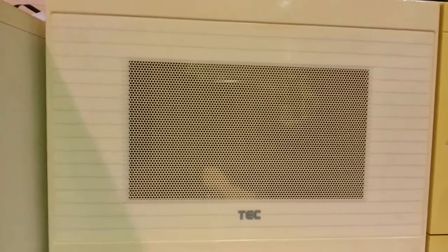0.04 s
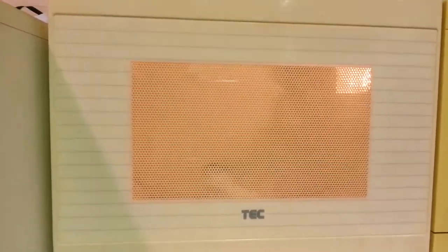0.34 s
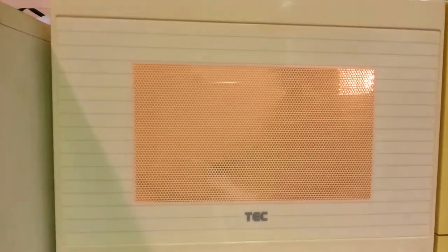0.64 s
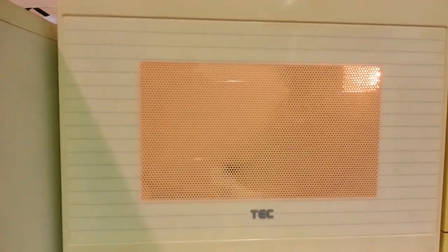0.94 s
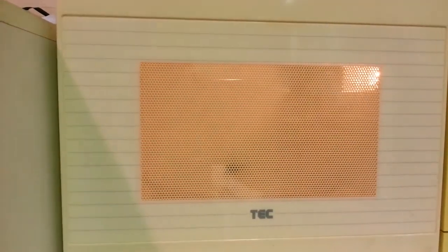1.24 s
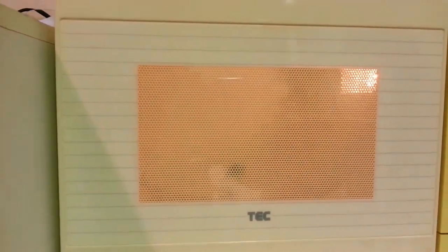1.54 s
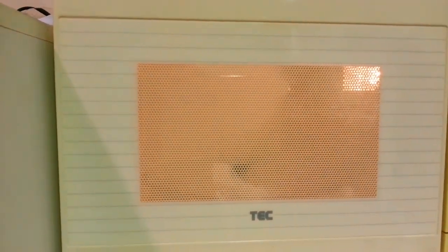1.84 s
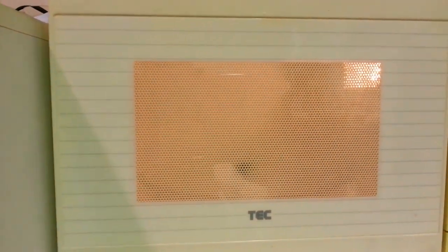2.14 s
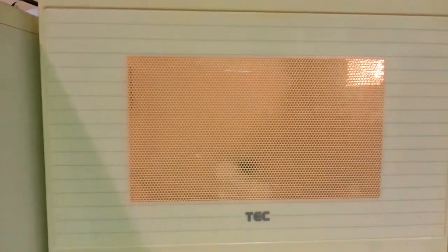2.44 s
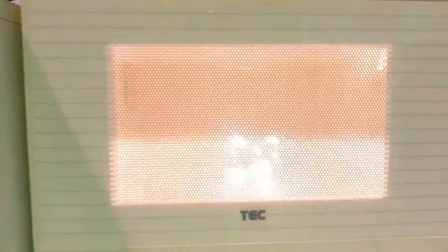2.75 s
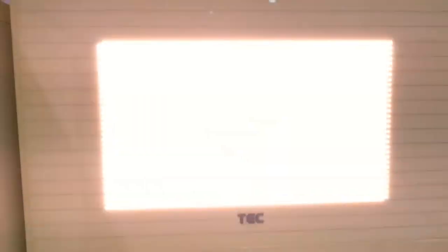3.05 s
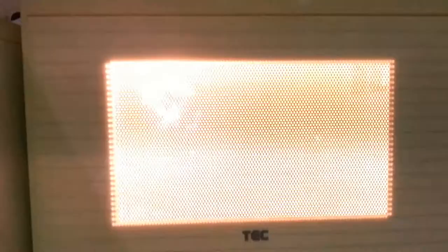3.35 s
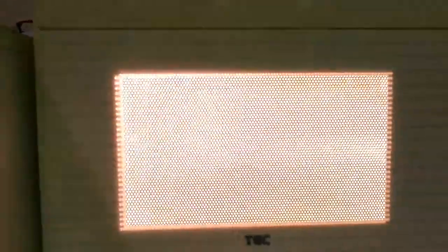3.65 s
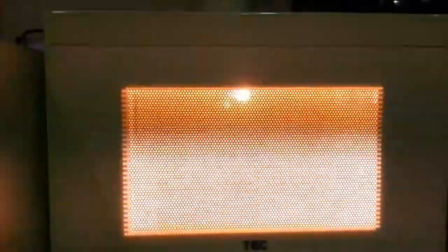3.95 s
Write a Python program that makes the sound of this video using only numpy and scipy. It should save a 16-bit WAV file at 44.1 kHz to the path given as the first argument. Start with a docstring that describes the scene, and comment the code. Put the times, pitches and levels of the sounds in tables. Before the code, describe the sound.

A microwave oven starts up close by, its metal cabinet shuddering and rattling as the fan spins up. The rattle settles and a deep electrical hum comes in, with faint ticks inside. Indoors, louder on the left.

```python
"""Beside a microwave oven, left microphone close to it, right one shaded. The motor starts, shudders
and rattles the steel cabinet while the fan runs up. The rattle settles, the transformer swells, then
the magnetron takes load with a deep mains hum. Faint ticks come from the cavity and an arc strikes
at the very end. Handling bumps the right microphone; room noise and fine hiss lie underneath."""
import sys
import numpy as np
from scipy import signal
from scipy.fft import rfft, irfft, next_fast_len
from scipy.io import wavfile
from scipy.ndimage import map_coordinates

SR = 44100
rng = np.random.default_rng(int(sys.argv[2]) if len(sys.argv) > 2 else 0)


def store_wav(level_fs):
    """Save 16-bit WAV to argv[1]."""
    pcm = np.round(np.clip(np.atleast_2d(level_fs), -1, 1) * 32767)
    wavfile.write(sys.argv[1], SR, pcm.T.astype(np.int16))


N = 176400

RUMBLE_SPECTRUM = [(30, -16), (70, 2), (130, 1), (225, -2.5), (330, 6.5), (390, 4), (540, -6), (800, -12),
                   (1300, -22.5), (3000, -62)]  # f/Hz, density/dB
RUMBLE_LEVEL = [(.25, -41), (.5, -35.5), (.85, -39.5), (1.2, -33), (1.55, -40.5), (1.75, -40.5),
                (2.15, -38), (2.6, -37), (4, -37.5)]  # t/s, level/dB
RATTLE_SPECTRUM = [(200, -26), (450, -4.5), (620, 2), (930, -4), (1200, 1.5), (1700, -2), (2000, -6.5),
                   (2600, -12), (3100, -12), (4500, -24.5), (14000, -31.5)]  # f/Hz, density/dB
RATTLE_LEVEL = [(.25, -44.5), (.9, -44), (1.22, -41), (1.5, -45.5), (1.7, -42.5), (2.1, -48.5), (2.25, -70),
                (2.7, -62), (4, -52.5)]  # t/s, level/dB
def motor():
    """The motor rumbles through the cabinet and rattles its panels."""
    rumble = noise(RUMBLE_SPECTRUM, ring=0.9) * amp(curve(RUMBLE_LEVEL))
    rattle = noise(RATTLE_SPECTRUM, ring=0.78, drive=amp(0.54 * wobble(250)))
    return running() * (rumble + rattle * amp(curve(RATTLE_LEVEL)))


# cabinet shudders: t/s, chatter gain/dB, drone gain/dB
SHUDDERS = [(0.114, -14, -17), (.240, -2, 6.5), (0.285, -1, -7), (0.334, -10, 5), (0.426, -1.5, 11.5),
            (.560, 4, 5), (0.58, -8, 1), (.664, -10, 10), (0.744, -3, 7), (.870, 2, -20), (.954, 2.5, 8.5),
            (1.035, 8, 7.5), (1.114, 7.5, 7.5), (1.196, 5.5, 7), (1.283, 4, 5), (1.316, -1.5, 3),
            (1.364, -2, -4), (1.438, -2, 6), (1.610, 6, 5)]
def shudders(column=1, rise_s=0.013, hold_s=0.008, decay_s=0.015):
    """Envelope of the cabinet's shudders: each rises, holds and fades."""
    out = np.zeros(N)
    for row in SHUDDERS:
        age = clock() - row[0]
        fade = np.exp(-np.maximum(age - rise_s - hold_s, 0) / decay_s)
        out += amp(row[column]) * np.clip(age / rise_s, 0, 1) * fade
    return out


def panels(drone_hz=329.5, throb_hz=9.6):
    """Shudders make the panels chatter and the side panel drone; motor unbalance keeps it throbbing."""
    grain = amp(2.6 * wobble(400))
    chatter = amp(-41) * shudders() * noise(RATTLE_SPECTRUM, ring=1.34, drive=grain)
    throb = amp(-45) * running() * (1 + 0.5 * np.sin(2 * np.pi * throb_hz * clock()))
    swing = np.hypot(throb, amp(-40) * shudders(column=2, decay_s=0.019))
    phase = 2 * np.pi * (drone_hz * clock() + 0.32 * wobble(20))
    return chatter + np.sqrt(2) * swing * np.sin(phase)


# mains harmonics: order, motor/dB, transformer/dB, magnetron/dB, right gain/dB
HARMONICS = [(1, -86, -70, -53, 5), (2, -71, -44, -36.5, -10.5), (3, -52.5, -35, -47.5, -13),
             (4, -49, -50.5, -46.5, -10.5), (5, -57.5, -46, -59, -22), (7, -54.5, -59, -41, -15.5),
             (8, -66.5, -56, -59, -22), (9, -58.5, -83, -62.5, -33), (13, -79, -70, -67, -12),
             (24, -66, -81, -73.5, -8.5)]
# electrical load: t/s, transformer gain/dB, magnetron gain/dB
LOAD = [(2.45, -38, -50), (2.7, -5.5, -28), (2.845, 4.5, -27), (2.87, 2, 3), (2.91, -5, 2.5),
        (3.1, -4.5, 3), (3.39, -3, 0.5), (3.49, -14, 4.5), (3.56, -14, -1), (3.75, -15, -2),
        (3.87, -6.5, -.5), (4, 3, -15)]
SIZZLE_SPECTRUM = [(1500, -10), (2400, -6), (3000, 5), (3500, -1), (4200, -9), (6000, -13), (14000, -30)]  # f/Hz, density/dB
def hum(mains_hz=50):
    """Stereo mains hum: the transformer swells and sizzles, then the magnetron draws current."""
    transformer, magnetron = amp(curve(LOAD)), amp(curve(LOAD, column=2))
    mains = 2 * np.pi * mains_hz * clock()
    out = np.zeros((2, N))
    for order, motor_db, transformer_db, magnetron_db, right_db in HARMONICS:
        phase = order * mains + 0.45 * rng.standard_normal() + 0.22 * wobble(9)
        rms = amp(motor_db) + amp(transformer_db) * transformer + amp(magnetron_db) * magnetron
        peak = np.sqrt(2) * rms * amp(wobble(17))
        out += peak * np.array([np.sin(phase), amp(right_db) * np.sin(phase - 0.9)])
    pulsing = 1 + 0.45 * np.cos(2 * mains)
    sizzle = amp(-63.5) * transformer * noise(SIZZLE_SPECTRUM, drive=pulsing)
    return running() * (out + np.array([sizzle, amp(-18) * sizzle]))


BLADE_RUN_UP = [(.25, 110, -61), (.55, 149.9, -39), (.95, 193.8, -40), (1.3, 225, -42.5), (1.6, 251, -38.5),
                (1.75, 260.3, -37), (2.1, 258.6, -35), (2.6, 260.6, -38.5), (4, 261, -40)]  # t/s, f/Hz, level/dB
BLADE_ORDERS = [(1, -4.5), (2, -10)]  # order, gain/dB
AIR_SPECTRUM = [(60, -7), (150, 10.5), (220, 11), (290, 16), (390, 13.5), (500, 7.5), (750, 4.5),
                (960, -1.5), (1080, 2.5), (1350, 0.5), (1650, -1), (2050, -8.5), (2600, -14.5),
                (3600, -16.5), (4400, -23), (14000, -52)]  # f/Hz, density/dB
AIR_LEVEL = [(.25, -43), (1.2, -48), (1.55, -38.5), (1.72, -34.5), (1.9, -37), (2.1, -32.5), (2.2, -37.5),
             (2.55, -42.5), (3.3, -44.5), (4, -42)]  # t/s, level/dB
def fan(jitter=0.009):
    """The fan runs up: an unsteady blade tone over rushing air."""
    blade_hz = curve(BLADE_RUN_UP) * (1 + jitter * wobble(34))
    phase = 2 * np.pi * np.cumsum(blade_hz) / SR
    tone = sum(amp(db + 1.73 * wobble(12)) * np.sin(order * phase) for order, db in BLADE_ORDERS)
    tone *= np.sqrt(2) * amp(curve(BLADE_RUN_UP, column=2))
    air = noise(AIR_SPECTRUM, ring=0.29, drive=amp(1.37 * wobble(120)))
    return running() * (tone + air * amp(curve(AIR_LEVEL)))


TICKS = [(0.12, -54.5, 0.058, .1), (0.23, -48, 0.1, 0.62), (0.246, -44, 0.16, 0.89),
         (0.316, -49.5, 0.32, 0.22), (0.427, -46.5, 0.096, 0.15), (.557, -47, 0.11, 0.17),
         (0.668, -47, 0.068, .99), (.986, -51, 0.13, 0.78), (1.124, -53, 0.17, 1), (1.211, -54, .06, 0.83),
         (1.359, -52, 0.054, 0.51), (3.008, -49.5, 0.14, .05), (3.31, -57, .09, .8)]  # t/s, level/dB, t60/s, ringing share of power
TICK_MODES = [(2975, 7), (3050, -11), (3205, 0), (3450, -4)]  # f/Hz, gain/dB
CRACK_SPECTRUM = [(1200, 3), (2500, 5), (3400, 4), (4400, -3.5), (6000, -9), (14000, -22)]  # f/Hz, density/dB
def ticks():
    """Light contacts in the cavity: a crack and a short glassy ring."""
    crack, out = noise(CRACK_SPECTRUM), np.zeros(N)
    for start_s, db, t60_s, share in TICKS:
        ring = unit(sum(amp(mode_db) * np.sin(2 * np.pi * (hz * clock() + 0.19 * wobble(130)))
                        for hz, mode_db in TICK_MODES))
        out += burst(start_s, db, t60_s) * (np.sqrt(share) * ring + np.sqrt(1 - share) * crack)
    return out


ARC_SPECTRUM = [(600, -5), (3600, 2.5), (4500, -2), (6400, -1.5), (14000, -10)]  # f/Hz, density/dB
def arc(start_s=3.983, push_hz=120):
    """A spark strikes in the cavity: crackle and a low push."""
    crackle = amp(-41.5) * noise(ARC_SPECTRUM)
    push = amp(-21.5) * np.sin(2 * np.pi * push_hz * (clock() - start_s))
    return burst(start_s, db=0, t60_s=0.22) * (crackle + push)


def click():
    """One faint dry click."""
    return burst(start_s=3.4233, db=-36, t60_s=0.0059)


RUB_SPECTRUM = [(20, -25), (42, 17), (68, 16.5), (100, 14.5), (140, 6), (230, -14), (500, -40), (1500, -48)]  # f/Hz, density/dB
RUB_LEVEL = [(.05, -46), (.45, -46), (.85, -46.5), (1.4, -45), (1.53, -50), (1.8, -46), (2.2, -48),
             (2.4, -36.5), (2.8, -46.5), (4, -45)]  # t/s, level/dB
BUMPS = [(0.169, 71, -31, 0.016), (1.052, 90.5, -25.5, 0.0091), (1.258, 128, -16.5, 0.018),
         (1.321, 90, -27, 0.012), (1.344, 92, -18, .024), (1.371, 108, -21, 0.015),
         (1.417, 104, -29, 0.026), (2.486, 109.6, -30, 0.019), (2.632, 141, -24, 0.013)]  # t/s, f/Hz, level/dB, length/s
def handling():
    """Handling of the microphone: low rubbing and soft bumps of a cycle or two."""
    out = noise(RUB_SPECTRUM) * amp(curve(RUB_LEVEL) + 2.7 * wobble(23.24))
    for start_s, hz, db, length_s in BUMPS:
        age = np.clip(clock() - start_s, 0, length_s)
        out += amp(db) * np.sin(np.pi * age / length_s) * np.sin(2 * np.pi * hz * age)
    return out


SHADE_RESPONSE = [(50, -4), (110, -9), (200, -14), (350, -16), (600, -19), (900, -22), (1100, -20),
                  (1500, -28), (3000, -22), (8000, -12)]  # f/Hz, gain/dB
def shaded(sound, lag_s=0.0003):
    """Path to the right microphone: direct sound plus wall echo, shaded and delayed."""
    walls = (rng.standard_normal(N) * burst(start_s=0, db=0, t60_s=0.14))[:SR // 4]
    echo = signal.fftconvolve(sound, walls / np.linalg.norm(walls))[:N]
    return filtered(sound + 0.42 * echo,
                    lambda f: amp(along(SHADE_RESPONSE, f)) * np.exp(-2j * np.pi * f * lag_s))


ROOM_SPECTRUM = [(30, -16), (130, -3.5), (620, -9), (800, -18), (1600, -22.5), (8000, -61)]  # f/Hz, density/dB
def room():
    """Steady low noise of a quiet room."""
    return amp(-53) * noise(ROOM_SPECTRUM, ring=0.14)


HISS_SPECTRUM = [(100, 23.5), (1000, 0.5), (2200, 1), (5000, -0.5), (14000, -3.5)]  # f/Hz, density/dB
HISS_LEVEL = [(.21, -63), (.24, -57.5), (.9, -60), (1.15, -55), (1.38, -57.5), (1.52, -59), (1.63, -58),
              (1.8, -58.5), (2.1, -56), (2.2, -59), (4, -59)]  # t/s, level/dB
def hiss():
    """Fine stereo hiss that flutters slightly and swells with each shudder."""
    pair = np.array([noise(HISS_SPECTRUM), noise(HISS_SPECTRUM)])
    level_db = curve(HISS_LEVEL) + 0.35 * wobble(23.55)
    return pair * amp(level_db) * np.hypot(1, 0.3 * shudders())


# cabinet resonances: f/Hz, width/Hz, lift/dB
CABINET_MODES = [(140, 37, 10.5), (180.5, 23, 14), (260, 28, 15.5), (313, 30.5, 12), (348.7, 22.6, 11.5),
                 (438.6, 42, 12), (486, 17, 11.5), (596, 23, 9), (660, 14, 9.5), (758, 50, 9.5),
                 (1043.7, 62, 18), (1290, 20, 4), (1424, 42, 14.5), (1660, 340, 9), (2166, 116, 9.5)]
def noise(spectrum, ring=0, drive=1):
    """Shaped noise of rms 1, modulated by drive; ring scales the lift of the cabinet's resonances."""
    def response(f):
        lift_db = sum(db / (1 + (2 * (f - hz) / width) ** 2) for hz, width, db in CABINET_MODES)
        return amp(along(spectrum, f) + ring * lift_db)
    return unit(filtered(drive * rng.standard_normal(N), response))


def running(start_s=0.2146, rise_s=0.025):
    """Switch-on envelope."""
    return np.clip((clock() - start_s) / rise_s, 0, 1) ** 2


def burst(start_s, db, t60_s):
    """Envelope with a sudden onset and exponential decay."""
    age = clock() - start_s
    return (age >= 0) * amp(db) * np.exp(-np.log(1000) * np.maximum(age, 0) / t60_s)


def amp(db):
    """Decibels to gain."""
    return 10 ** (np.asarray(db) / 20)


def unit(x):
    """x at rms 1."""
    return x / np.sqrt(np.mean(x ** 2) + 1e-20)


def along(points, hz):
    """A frequency table interpolated on a log axis."""
    f, db = np.transpose(points)
    return np.interp(np.log(hz + 1), np.log(f + 1), db)


def clock():
    """Sample times in seconds."""
    return np.arange(N) / SR


def curve(rows, column=1):
    """One column of a time table, per sample."""
    rows = np.array(rows)
    return np.interp(clock(), rows[:, 0], rows[:, column])


def wobble(knots_per_s):
    """Smooth random curve."""
    return map_coordinates(rng.standard_normal(1024), [clock() * knots_per_s], mode="mirror")


def filtered(x, response):
    """x through a frequency response."""
    size = next_fast_len(N + SR // 2)
    return irfft(rfft(x, size) * response(np.fft.rfftfreq(size, 1 / SR)), size)[..., :N]


def scene():
    """The oven, loud on the left and shaded on the right, over room noise and hiss."""
    left = motor() + panels() + fan() + ticks() + arc() + room()
    right = shaded(left)
    return hiss() + np.array([left, right + handling()]) + hum() + click()


def record(dry):
    """Band limit at 14.6 kHz."""
    return filtered(dry, lambda hz: hz < 14600)


dry = scene()
out = record(dry)
store_wav(out)
```